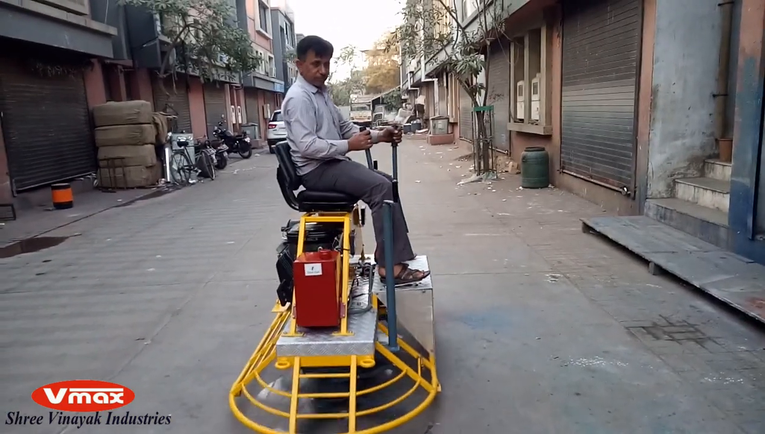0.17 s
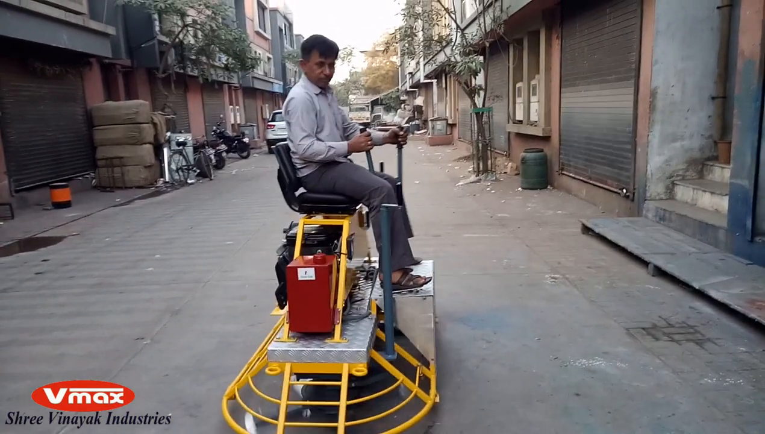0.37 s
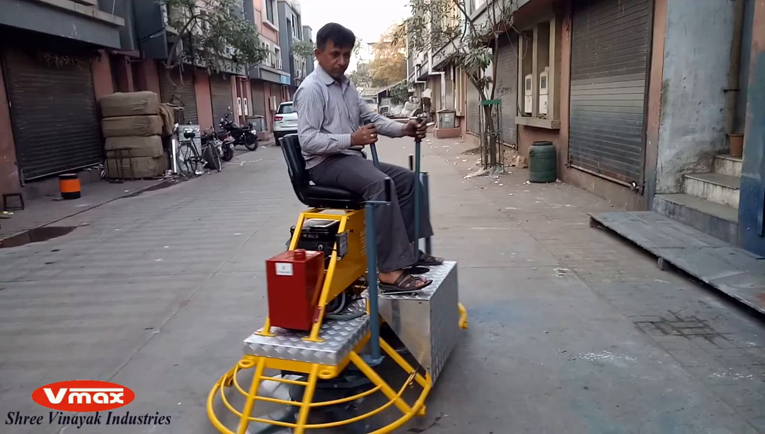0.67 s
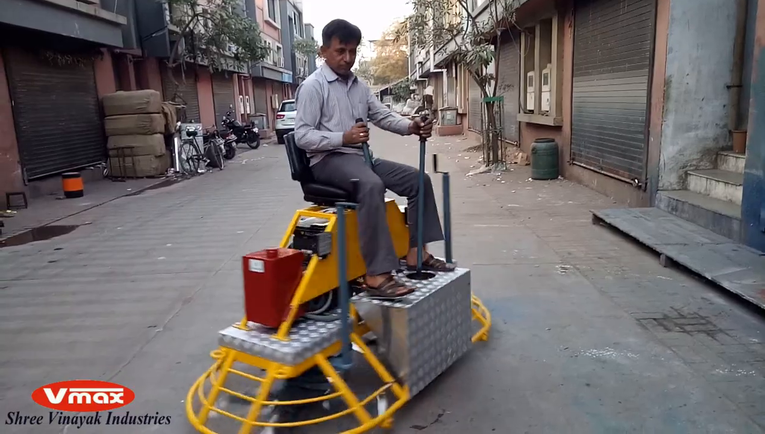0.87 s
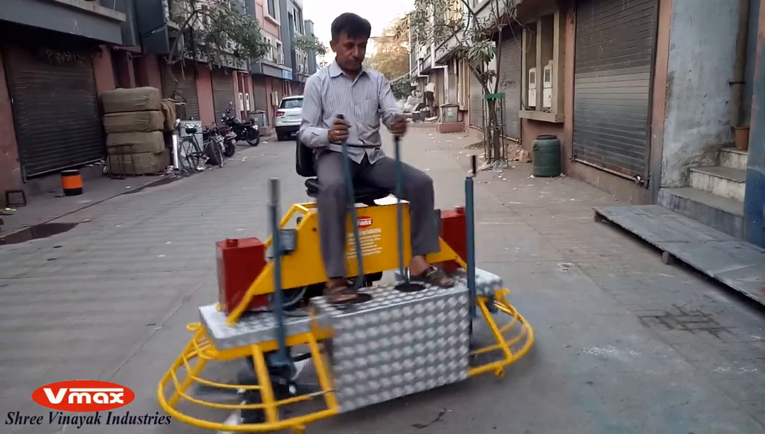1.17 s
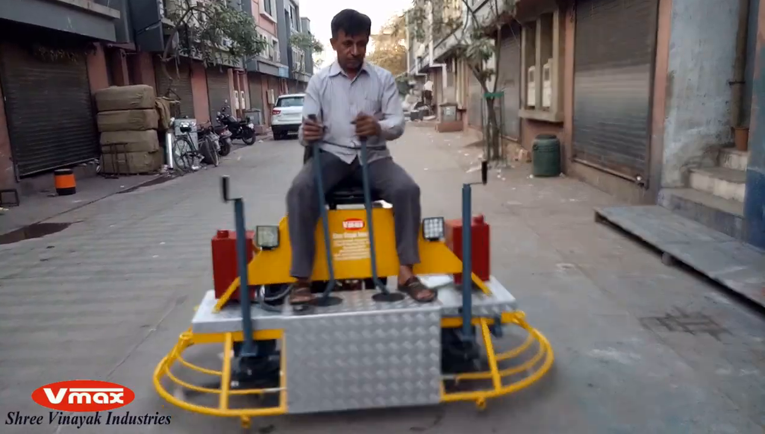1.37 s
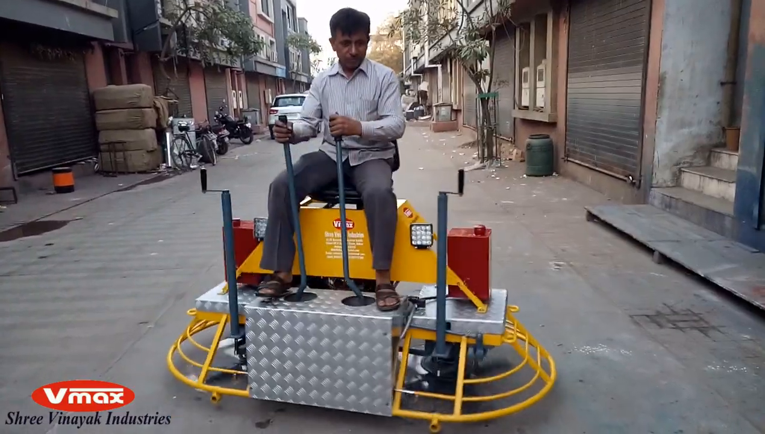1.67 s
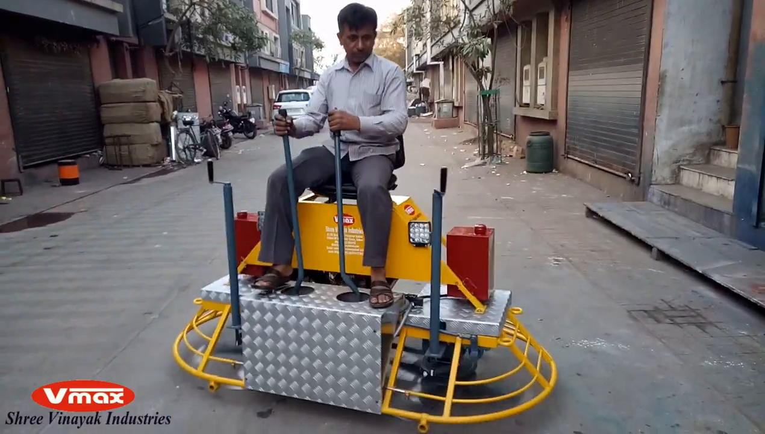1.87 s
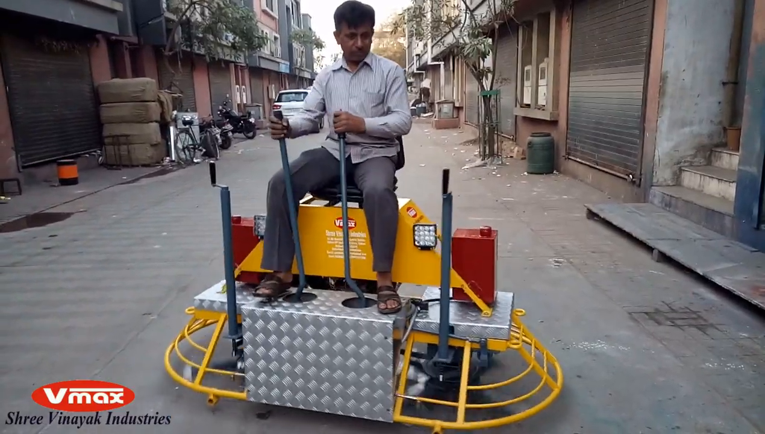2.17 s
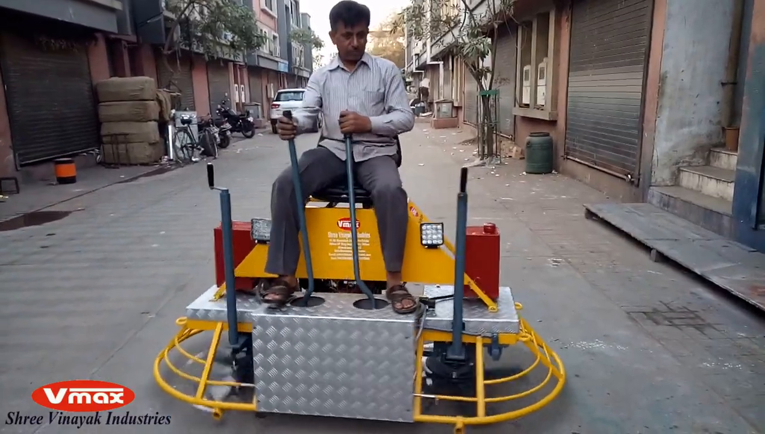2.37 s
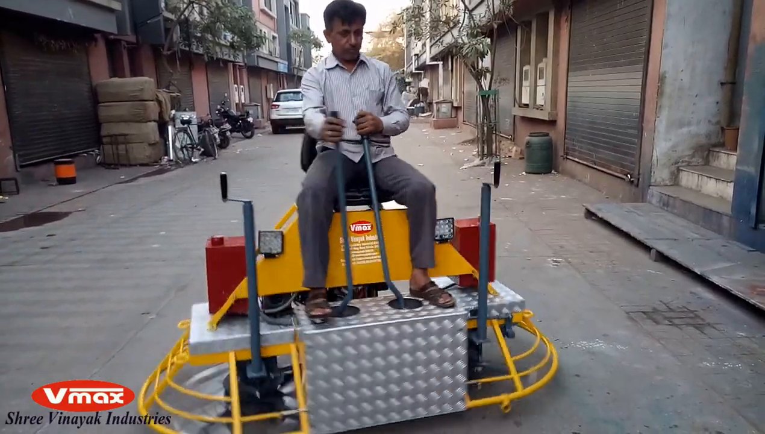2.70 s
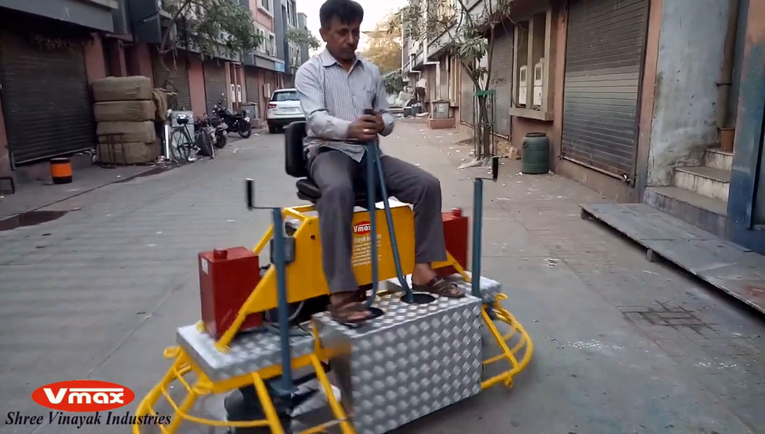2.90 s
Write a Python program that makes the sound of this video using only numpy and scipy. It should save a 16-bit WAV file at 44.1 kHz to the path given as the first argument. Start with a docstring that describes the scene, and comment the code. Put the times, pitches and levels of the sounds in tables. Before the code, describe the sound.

A ride-on power trowel turns close by on a dry concrete street: uneven twin-cylinder throbbing and metallic clatter under loud bright blade grinding, heard mostly left by a close stereo microphone.

```python
"""On a dry concrete street a ride-on power trowel swings round, close by and mostly to the left.
Its twin-cylinder engine throbs through a silencer, sags under load and picks up again: each firing
is a pulse that thumps, rings silencer and steel panels, and puffs through a noise of clatter and rush.
The steel blades grind over the grit in a loud bright hiss of grains and ringing steel that surges
when they bite; single rasps, a soft rumble and a faint top hiss lie around it."""
import sys
import numpy as np
from scipy import signal
from scipy.fft import rfft, irfft
from scipy.io import wavfile
from scipy.ndimage import uniform_filter1d, minimum_filter1d

SR = 44100
rng = np.random.default_rng(int(sys.argv[2]) if len(sys.argv) > 2 else 0)


def pcm_store(signal):
    """Save signal as 16-bit PCM."""
    levels = np.round(np.clip(np.atleast_2d(signal), -1, 1) * 32767)
    wavfile.write(sys.argv[1], SR, levels.astype(np.int16).T)


N = 134064
TIME = np.arange(N) / SR
FREQS = np.maximum(np.arange(N // 2 + 1) * SR / N, 1)
RIGHT_LAG_S = 0.000933  # the right microphone hears the machine this much later


def from_db(db):
    """Decibels to gain."""
    return 10 ** (np.asarray(db) / 20)


def rms_one(x):
    """Scale to unit rms."""
    return x / np.sqrt(np.mean(x ** 2) + 1e-20)


def evened(x):
    """Hold the rms near 1 over every quarter second."""
    return x / np.sqrt(uniform_filter1d(x ** 2, size=SR // 4) + 1e-20)


def in_time(rows, axis=1):
    """One column of a curve at every sample."""
    columns = np.transpose(rows)
    return np.interp(TIME, columns[0], columns[axis])


def swing(rows, axis=1):
    """A level curve in dB about its mean."""
    db = in_time(rows, axis=axis)
    return db - db.mean()


def in_frequency(rows):
    """Each column of a spectrum at every frequency, interpolated over log frequency."""
    hz, *columns = np.transpose(rows)
    return [np.interp(np.log(FREQS), np.log(hz), column) for column in columns]


def drift(corner_hz):
    """Smooth random wander of rms 1, mostly slower than the corner."""
    white = rng.standard_normal(N)
    return rms_one(irfft(rfft(white) / (1 + (FREQS / corner_hz) ** 2), N))


def bump(s, length):
    """A bell of height 1, half as high at the ends of its length."""
    return .5 ** ((2 * (TIME - s) / length) ** 2)


def below(x, hz, power):
    """The part of a sound below a soft crossover, without delay."""
    return irfft(rfft(x) / (1 + (FREQS / hz) ** power), N)


def resonance(x, hz, width_hz):
    """Two-pole resonance with gain near 1 at its peak."""
    r = np.exp(-np.pi * width_hz / SR)
    feedback = [1, -2 * r * np.cos(2 * np.pi * hz / SR), r * r]
    return signal.lfilter((1 - r * r) / 2 * np.array([1, 0, -1]), feedback, x)


def delayed(x, seconds):
    """The same sound a little later."""
    return np.interp(TIME - seconds, TIME, x, left=0)


def from_left(x, right_db):
    """A source on the left: the right side hears it later and weaker."""
    return np.array([x, from_db(right_db) * delayed(x, RIGHT_LAG_S)])


def coloured(direct, diffuse, spectrum):
    """Colour a white source for both sides; the right gets it late and mixed with diffuse sound."""
    # likeness of the two sides: (frequency [Hz], likeness [0-1])
    likeness = [(50, 1), (220, 1), (350, 0.62), (540, 1), (900, 0.62), (1700, 0.98), (2600, 0.6),
                (3600, 0.1), (6000, 0.12)]
    left_db, right_db = in_frequency(spectrum)
    alike = in_frequency(likeness)[0]
    left = rfft(direct)
    right = alike * rfft(delayed(direct, RIGHT_LAG_S)) + np.sqrt(1 - alike ** 2) * rfft(diffuse)
    # SR / 2 turns the density per Hz into amplitude
    return np.sqrt(SR / 2) * irfft([left * from_db(left_db), right * from_db(right_db)], N)


def top_hiss(flicker_db=2.5):
    """A faint, flickering noise that lies mostly above the scraping."""
    # hiss spectrum: (frequency [Hz], left [dB per Hz], right [dB per Hz])
    hiss_spectrum = [(5000, -110, -110), (8100, -99, -116), (8860, -120, -91.5), (13200, -99, -111),
                     (13800, -100, -100), (14800, -86, -83), (15300, -82, -101)]
    return from_db(flicker_db * drift(25)) * coloured(*rng.standard_normal((2, N)), hiss_spectrum)


def rumble():
    """A soft, uneven rumble of the frame: dull noise under the engine tones."""
    # rumble spectrum before its swing: (frequency [Hz], left [dB per Hz], right [dB per Hz])
    rumble_spectrum = [(20, -68, -80), (40, -62, -76), (80, -64, -74), (150, -61, -76), (221, -61, -87),
                       (400, -100, -110)]
    # rumble level, used about its mean: (time [s], level [dB])
    rumble_level = [(0.0, -47), (0.1, -57), (1.85, -59.5), (2.0, -57.5), (2.3, -50.5), (2.6, -52),
                    (3.04, -60)]
    return from_db(swing(rumble_level)) * coloured(*rng.standard_normal((2, N)), rumble_spectrum)


def firings(cycles):
    """One pressure pulse per cylinder and cycle, unevenly spaced as in a V-twin."""
    # the two firings of a cycle: (place in the cycle [0-1], level [dB])
    cylinders = [(0.942, 0), (0.564, -2.5)]
    spread_db, jitter_s = .5, .00006
    pulses = np.zeros(N)
    for place, db in cylinders:
        s = np.interp(np.arange(place, cycles[-1], 1), cycles, TIME)
        late, strong = rng.standard_normal((2, len(s)))
        at = np.clip((s + jitter_s * late) * SR, 0, N - 1).astype(int)
        pulses[at] += from_db(db + spread_db * strong)
    return pulses


def panels(pulses, rattle=0.81):
    """Steel panels resonate, driven by the firings and a random rattle."""
    # panel resonances before the swing: (frequency [Hz], width [Hz], level [dB])
    panel_modes = [(399, 8.5, -47.5), (543, 23, -41.5), (682, 20, -47.5)]
    # hum level, used about its mean: (time [s], level [dB])
    panel_level = [(0, -4), (.6, -0.5), (1.22, -4), (1.36, 0.5), (1.58, -4.5), (1.98, 1), (2.2, -6),
                   (2.45, -2.5), (3.04, 2.5)]
    force = rms_one(pulses) + rattle * rng.standard_normal(N)
    rings = sum(from_db(db) * rms_one(resonance(force, hz, width)) for hz, width, db in panel_modes)
    return from_left(from_db(swing(panel_level)) * rings, right_db=-14.5)


def clatter(pulses):
    """Rough mechanical clatter and rush of the engine: noise with a decaying puff at each firing."""
    # engine noise before trim and swing: (frequency [Hz], left [dB per Hz], right [dB per Hz])
    clatter_spectrum = [(119, -89, -100), (177, -53.5, -72), (258, -56.5, -71), (358, -60.5, -73),
                        (506, -56, -69.5), (680, -59, -68.5), (920, -62, -75), (1450, -59.5, -77.5),
                        (2360, -59, -75), (4160, -100, -100)]
    # levels used about their means: (time [s], low clatter [dB], rush above it [dB])
    clatter_level = [(0, -35, -33.5), (.25, -33, -33.5), (.55, -35.5, -36), (.72, -36, -33.5),
                     (.8, -37, -37.5), (1.2, -38, -33), (1.32, -34.5, -34.5), (1.5, -34, -32.5),
                     (1.63, -38.5, -37), (1.75, -32.5, -33.5), (1.97, -36.5, -33.5), (2.1, -36, -34.5),
                     (2.29, -38, -34), (2.38, -34, -31.5), (2.5, -34.5, -34), (3.04, -33.5, -33)]
    trim_db, puff_s, puff_share = -1, 0.0013, 0.077
    rough_db, rough_hz, rush_from_hz = .9, 70, 1100
    puff = signal.lfilter([1], [1, -np.exp(-1 / (puff_s * SR))], pulses + 1e-18)
    level = rms_one((1 + puff_share * puff) * from_db(rough_db * drift(rough_hz)))
    noise = level * rng.standard_normal((2, N))
    sound = from_db(trim_db) * coloured(*noise, clatter_spectrum)
    low = below(sound, rush_from_hz, 6)
    rush = sound - low
    return from_db(swing(clatter_level)) * low + from_db(swing(clatter_level, axis=2)) * rush


def exhaust(pulses):
    """Each firing thumps straight out of the tailpipe and rings the silencer resonances."""
    # silencer resonances: (frequency [Hz], width [Hz], level within its group [dB])
    boom_modes = [(99.6, 8, 0)]
    hum_modes = [(132.6, 26, 0)]
    drone_modes = [(171.6, 2.6, 2), (176.7, 4.7, -7), (190.5, 7.6, 9), (216.2, 5.1, 5.5), (246.5, 6.9, 4.5)]
    # levels before the trims, as the machine turns:
    # (time [s], direct thump [dB], boom [dB], hum [dB], drone [dB])
    exhaust_level = [(0, -31, -29, -37, -33), (0.25, -29, -28, -33, -32), (0.5, -29.6, -33, -37, -32),
                     (0.75, -29.5, -34, -36.5, -34), (1, -30, -42, -35.5, -34), (1.3, -31, -31.5, -39, -34),
                     (1.55, -29, -42, -40, -34), (1.85, -29, -50, -52, -40), (2.03, -36, -40, -46, -38),
                     (2.3, -34, -42, -44, -40), (2.5, -33.5, -40, -46, -38), (2.75, -33, -37, -42, -31),
                     (3.04, -31, -31, -37, -33)]
    # one resonance swells into a tone: (time [s], length [s], frequency [Hz], level [dB])
    swells = [(.35, 0.2, 214, -36), (1.326, 0.31, 213.4, -34.5), (1.527, 0.2, 167.8, -34),
              (2.392, 0.2, 193, -29.5), (2.63, 0.17, 174.6, -36.5), (2.844, 0.21, 195.4, -32.5)]
    thump_trim_db, boom_trim_db, hum_trim_db, drone_trim_db = 1, 1.5, -1.5, 2.5
    swell_width_hz, sub_cut_hz = 8.6, 58  # width of each of two passes
    band = signal.butter(3, [62, 175], "band", fs=SR, output="sos")
    puffs = signal.sosfilt(band, pulses)
    out = from_db(in_time(exhaust_level) + thump_trim_db) * rms_one(puffs)
    # the rings are subtracted: opposite polarity to the thump
    groups = [(boom_modes, boom_trim_db), (hum_modes, hum_trim_db), (drone_modes, drone_trim_db)]
    for column, (modes, trim_db) in enumerate(groups, 2):
        rings = sum(from_db(db) * resonance(puffs, hz, width) for hz, width, db in modes)
        out = out - from_db(in_time(exhaust_level, axis=column) + trim_db) * evened(rings)
    for s, length, hz, db in swells:
        tone = resonance(resonance(puffs, hz, swell_width_hz), hz, swell_width_hz)
        out = out - from_db(db) * bump(s, length) * evened(tone)
    out = below(out, sub_cut_hz, -12.)  # the negative power keeps what lies above
    return from_left(out, right_db=-11.5)


def grit():
    """Grains cracking under steel, over smooth rubbing; white, rms about 1."""
    grains_per_s, spread_db, smooth_share = 5000, 2.5, 0.35  # share of the power
    sizes = from_db(spread_db * np.minimum(rng.exponential(1, N), 5))
    signed = sizes * rng.choice([-1, 1], N)
    grains = rms_one(signed * (rng.random(N) < grains_per_s / SR))
    return np.sqrt(1 - smooth_share) * grains + np.sqrt(smooth_share) * rng.standard_normal(N)


def rasp():
    """Grit catches under one blade edge and makes it sing roughly: grit noise through a wide resonance."""
    # rasps: (time [s], length [s], pitch [Hz], level [dB])
    catches = [(.865, .04, 4950, -22.5), (.955, .07, 4740, -21.5), (.97, .05, 5280, -26),
               (1.17, .11, 4740, -23), (2.03, .08, 4650, -30), (2.32, .08, 4600, -25)]
    width_hz = 150  # of each of two passes
    rings = np.zeros(N)
    for s, length, hz, db in catches:
        ring = resonance(resonance(grit(), hz, width_hz), hz, width_hz)
        rings += from_db(db) * bump(s, length) * rms_one(ring)
    return from_left(rings, right_db=-34)


def blades(cycles):
    """Grit excites the blades; their pressure shakes with the engine and chatters, and bites alter the level."""
    # blades on concrete before trim and levels: (frequency [Hz], left [dB per Hz], right [dB per Hz])
    scrape_spectrum = [(895, -98, -84.5), (1680, -65, -71.5)] + [(1600, -61.2, -74.9), (2215, -58.5, -90.0),
                       (2495, -50.0, -73.0), (3000, -48.5, -75.0), (3260, -49.0, -72.0),
                       (4750, -49.5, -72.0), (5427, -57.0, -73.0), (5996, -63.5, -72.5),
                       (6890, -76.5, -76.5), (7360, -100.0, -84.0)][1:] + [(8030, -105, -100),
                       (10000, -125, -125)]
    # slow changes as the machine turns: (time [s], ringing [dB], bright hiss [dB])
    scrape_level = [(0, -1, 0), (0.3, 1.2, 0.4), (0.55, -1, -0.6), (0.8, -0.2, 0), (1.05, -1.5, 0.8),
                    (1.3, -0.4, -1), (1.55, 0, -2), (1.8, 0.7, -3.5), (2.05, 0.5, 2.5), (2.3, -1.3, -0.5),
                    (2.55, 2.1, 1.5), (2.8, 1.5, 1.5), (3.04, 0, 0)]
    # ringing of the blades before the levels: (frequency [Hz], width [Hz], level [dB])
    blade_modes = [(2800, 40, -26.5), (2933, 57, -27.5), (3035, 17, -29.5), (3208, 25, -28.5),
                   (4500, 27, -41)]
    # a blade bites harder: (time [s], length [s], change of ringing [dB], change of bright hiss [dB])
    bites = [(0.124, 0.025, 3.5, -1), (0.402, 0.04, 2, 2), (0.683, 0.098, 0, 2.5), (.862, 0.034, -0.5, 4),
             (0.95, 0.017, -0.5, 9), (0.991, 0.012, 6.5, 3), (1.113, 0.028, 3.5, 3.5),
             (1.168, 0.03, 4.5, 4), (1.563, 0.0063, 8, 3), (1.7, .02, -0.5, 2), (1.777, 0.07, -2, 7.5),
             (2, 0.0087, -4, 2), (2.192, 0.027, 5, -3.5), (2.308, 0.081, 3.5, 5), (2.572, 0.02, 1, 1.5),
             (2.616, 0.036, 0, 2), (2.965, 0.027, 8, 4.5)]
    # the blades skim lightly: (time [s], length [s], change of pressure [dB])
    skims = [(0.527, .03, -0.5), (0.836, 0.0086, -7), (1.555, 0.0069, -11), (1.912, 0.014, -1.5),
             (2.073, 0.018, -6.5), (2.97, 0.039, -5)]
    # the engine shakes the blades: (multiple of the cycle rate, depth [dB], crest place [cycles])
    shakes = [(1, 0.66, 1), (2, 0.26, 0.16), (3, 1, 0.08)]
    trim_db, bright_from_hz = -0.92, 3840
    chatter_db, chatter_hz, wander_db, wander_hz = .9, 110, 1.5, 16

    shake_db = sum(db * np.cos(2 * np.pi * k * (cycles - place)) for k, db, place in shakes)
    skim_db = sum(db * bump(s, length) for s, length, db in skims)
    pressure_db = shake_db + chatter_db * drift(chatter_hz) + skim_db

    rings = np.zeros(N)
    for hz, width, db in blade_modes:
        force = from_db(pressure_db + wander_db * drift(wander_hz)) * grit()
        rings += from_db(db) * rms_one(resonance(force, hz, width))
    rings = signal.sosfilt(signal.butter(2, [2300, 5000], "band", fs=SR, output="sos"), rings)

    direct = from_db(pressure_db) * grit()
    diffuse = from_db(pressure_db / 2) * grit()  # diffuse sound follows the pressure half as far
    scrape = from_db(trim_db) * coloured(direct, diffuse, scrape_spectrum)
    sound = scrape + from_left(rings, right_db=-33)

    low = below(sound, bright_from_hz, 10)
    bright = sound - low
    ring_db = in_time(scrape_level) + sum(db * bump(s, length) for s, length, db, _ in bites)
    bright_db = in_time(scrape_level, axis=2) + sum(db * bump(s, length) for s, length, _, db in bites)
    return from_db(ring_db) * low + from_db(bright_db) * bright


def scene():
    """One engine cycle drives the firings and shakes the blades; all layers add up."""
    # engine speed: (time [s], four-stroke cycles per second [Hz])
    speed = [(0.0, 16.252), (0.4, 16.421), (0.7, 16.54), (1.0, 16.757), (1.2, 16.244), (1.5, 16.699),
             (1.7, 16.629), (1.9, 16.592), (2.1, 15.613), (2.3, 14.574), (2.5, 15.068), (2.65, 15.752),
             (2.85, 17.422), (3.04, 17.639)]
    cycles = np.cumsum(in_time(speed)) / SR
    pulses = firings(cycles)
    background = top_hiss() + rumble()
    engine = panels(pulses) + clatter(pulses) + exhaust(pulses)
    return background + engine + rasp() + blades(cycles)


def record(dry):
    """A limiter ducks the highest peaks on both sides; the ends are soft and the top is cut steeply."""
    peak_limit, edge_s, cutoff_hz = .85, .003, 15600  # limit acts ahead of the top cut
    room = np.minimum(1, peak_limit / (np.abs(dry).max(axis=0) + 1e-9))
    held = minimum_filter1d(room, size=257)
    gain = uniform_filter1d(uniform_filter1d(held, size=129), size=129)
    ends = np.minimum(1, np.minimum(TIME, TIME[::-1]) / edge_s)
    top_cut = signal.ellip(12, .1, 80, cutoff_hz, fs=SR, output="sos")
    return signal.sosfilt(top_cut, ends * gain * dry)


dry = scene()
out = record(dry)
pcm_store(out)
```